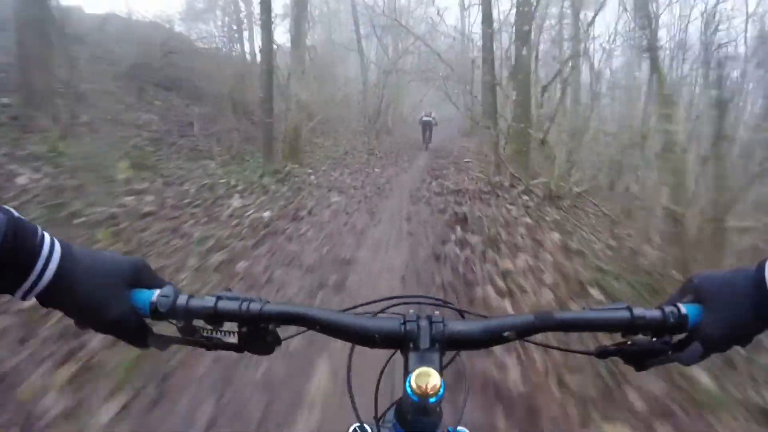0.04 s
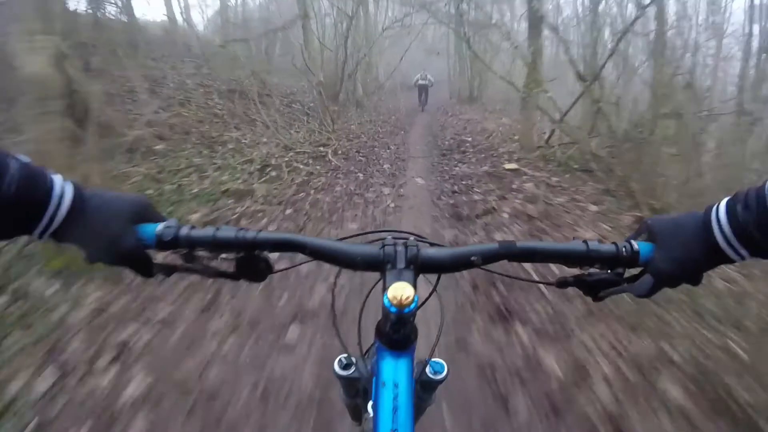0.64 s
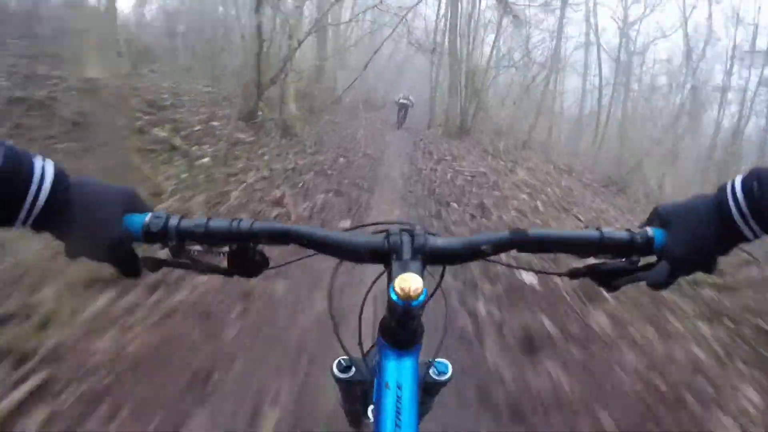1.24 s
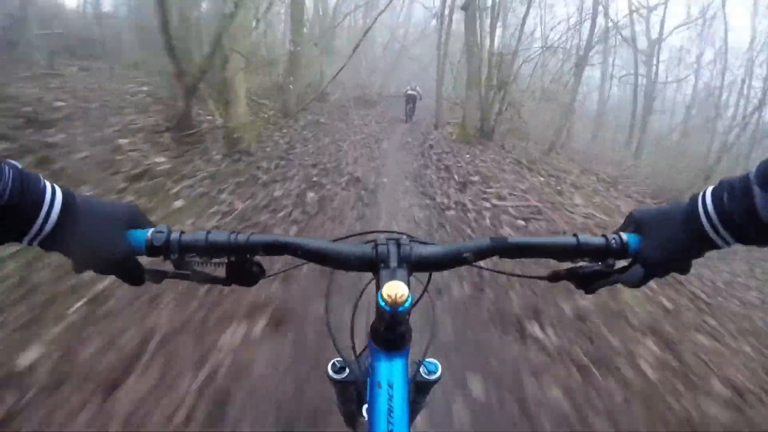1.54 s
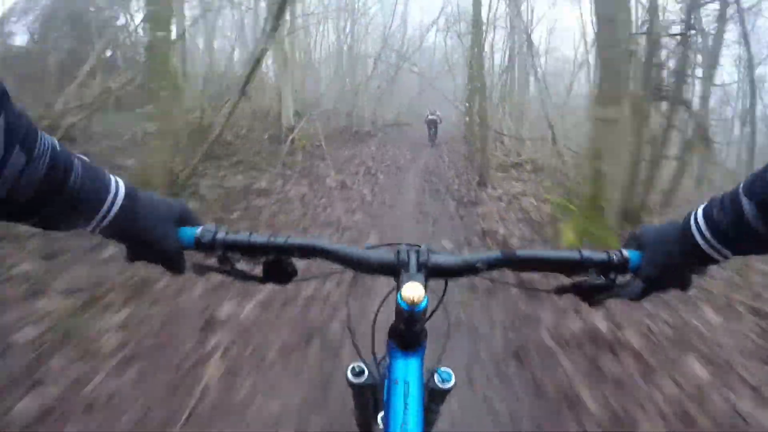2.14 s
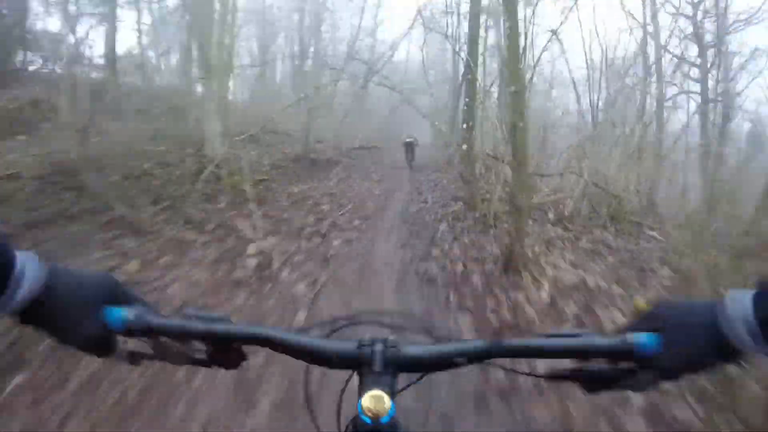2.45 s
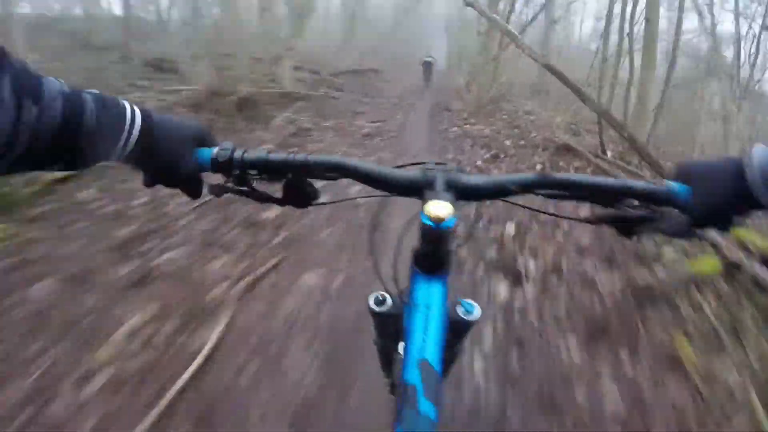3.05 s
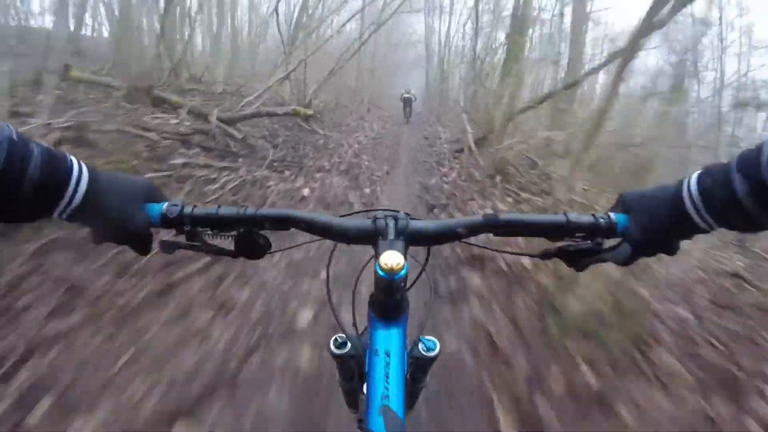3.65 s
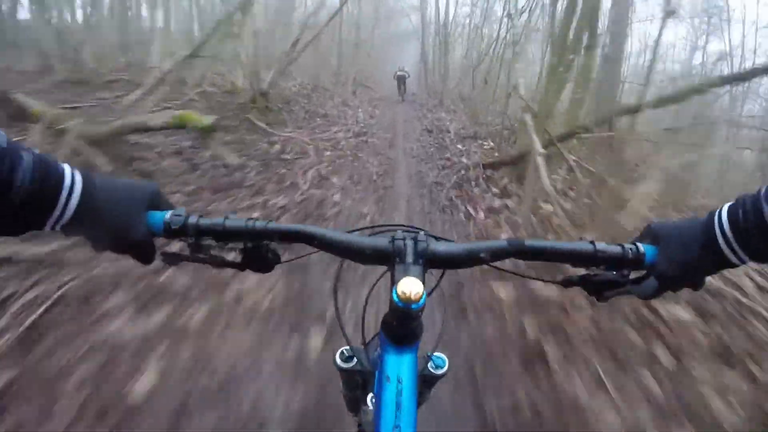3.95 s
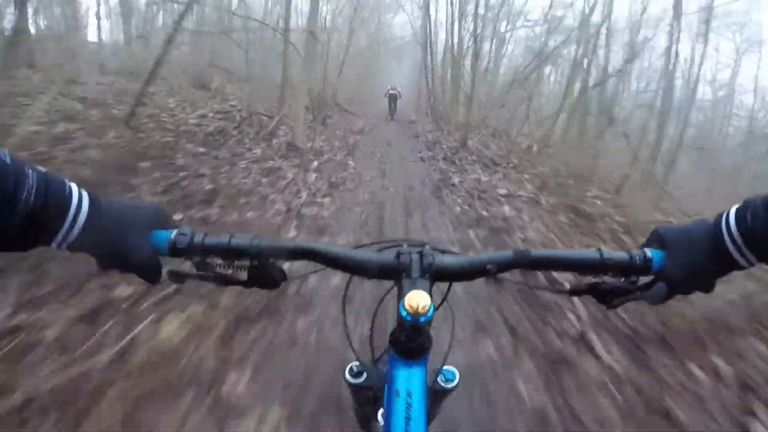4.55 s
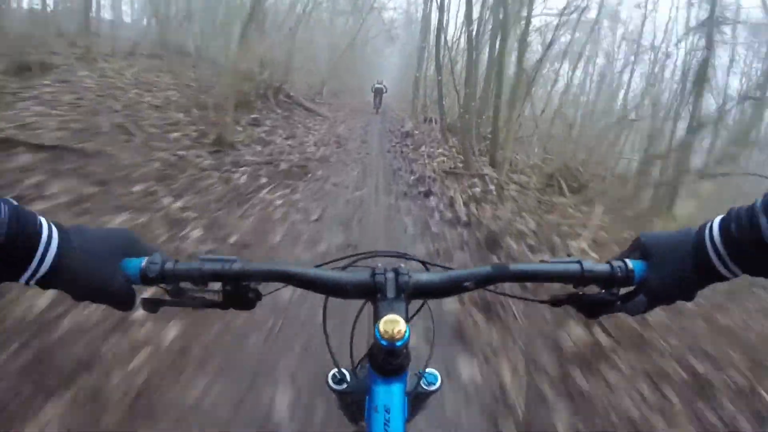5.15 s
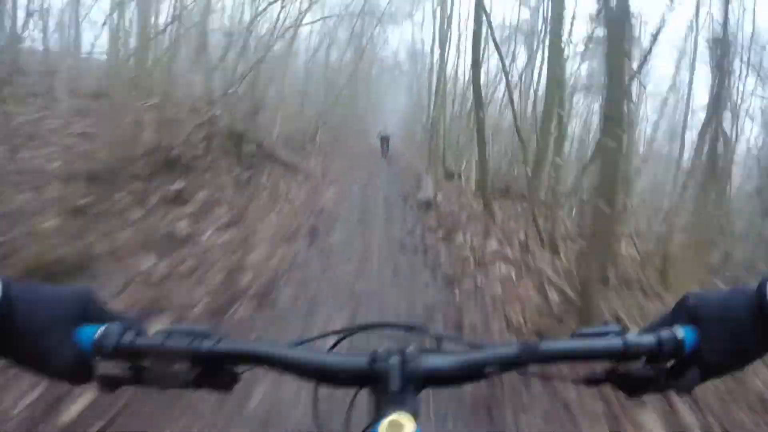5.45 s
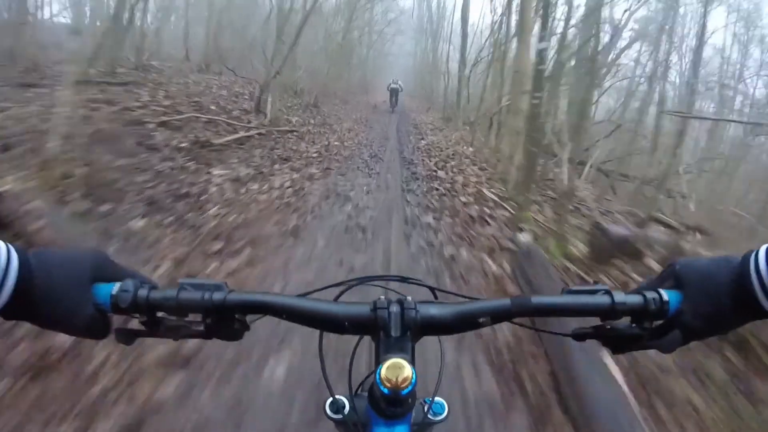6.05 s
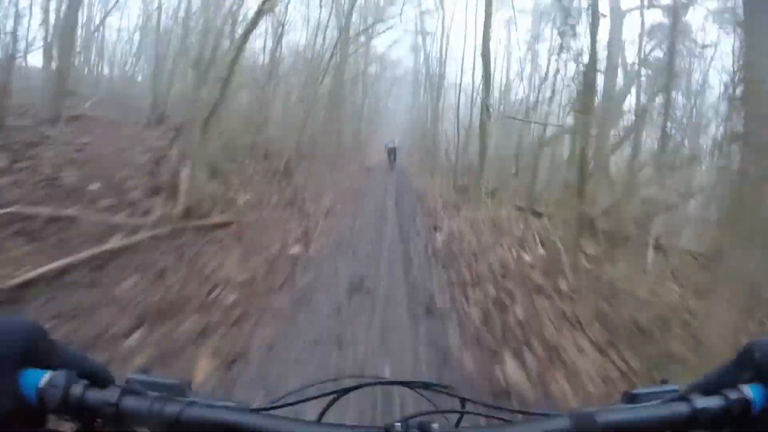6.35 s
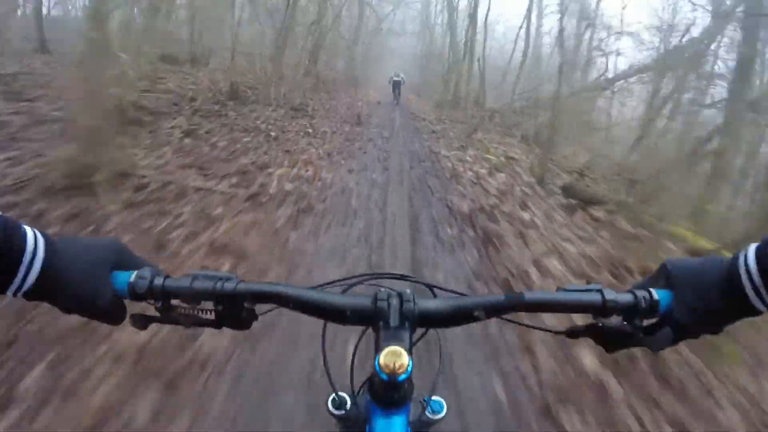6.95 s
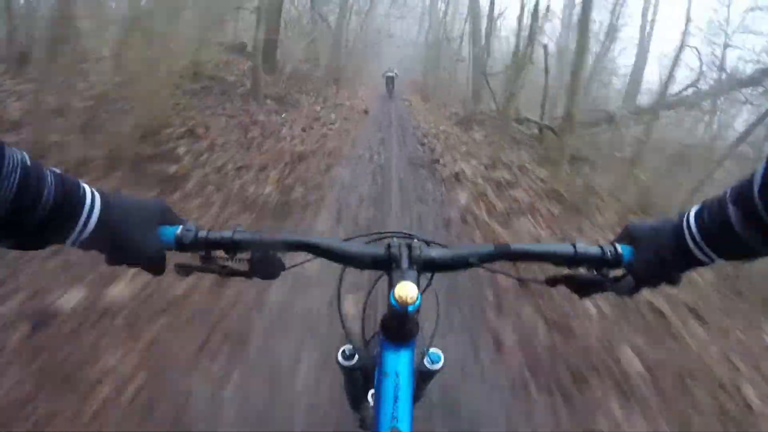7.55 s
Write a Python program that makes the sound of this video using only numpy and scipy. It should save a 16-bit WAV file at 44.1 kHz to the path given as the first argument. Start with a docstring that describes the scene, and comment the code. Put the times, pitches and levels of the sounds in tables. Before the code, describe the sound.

Low, gusting wind beats on a close, body-worn microphone while bike tyres crunch and hiss along a wet forest track, both swelling over bumps. Cables and chain rattle faintly throughout. Sharp pings of grit come first, then one deep thump from a bump, then a few chain clacks on the frame among further grit clicks and soft leaf swishes. A very faint electronic whine and hiss lie underneath.

```python
"""A mountain bike rolls fast down a muddy forest trail, heard from a cased camera on the rider's chest.
From the start, turbulent air buffets the case and the tyres churn mud and wet leaves, both swelling as
bumps load the wheels, over a faint electronic whine and hiss. Loose parts rattle and a soft jolt passes.
From two seconds on, flung grit rings the shell; near three, a hard jolt thumps the camera.
In the second half the chain knocks on the frame and leaves swish along the tread."""
import sys
import numpy as np
from scipy import signal
from scipy.fft import rfft, irfft, next_fast_len
from scipy.io import wavfile
from scipy.ndimage import map_coordinates

SR = 44100
rng = np.random.default_rng(int(sys.argv[2]) if len(sys.argv) > 2 else 0)


def store_pcm(level_fs):
    """Save levels as 16-bit WAV."""
    pcm = np.round(np.clip(level_fs, -1, 1) * 32767).astype(np.int16)
    wavfile.write(sys.argv[1], SR, np.atleast_2d(pcm).T)


N = 344421


def amp(db):
    """Amplitude ratio of a level in decibels."""
    return 10 ** (np.asarray(db) / 20)


def unit(x):
    """Normalisation to an rms of 1."""
    return x / np.sqrt(np.mean(x ** 2) + 1e-20)


def crest(x):
    """Normalisation to a peak of 1."""
    return x / (np.abs(x).max() + 1e-20)


def curve(points):
    """Linear interpolation of (time [s], value) points at every sample."""
    return np.interp(np.arange(N) / SR, *np.transpose(points))


def swells(rows):
    """Superposition of Gaussian pulses, from rows of (time [s], width [s], height)."""
    t = np.arange(N) / SR
    return sum(height * np.exp(-((t - s) / width) ** 2 / 2) for s, width, height in rows)


def wobble(rate):
    """Slow random modulation: a spline through `rate` random knots a second."""
    return map_coordinates(rng.standard_normal(int(N * rate / SR) + 4), [np.arange(N) * rate / SR])


def colour(x, spectrum):
    """Minimum-phase filtering through (frequency [Hz], gain [dB]) points on a log frequency axis."""
    size = 2 * next_fast_len(len(x) // 2 + 4096)
    hz, db = np.transpose(spectrum)
    gain_db = np.interp(np.log(np.fft.rfftfreq(size, 1 / SR) + 1), np.log(hz + 1), db)
    cepstrum = irfft(np.log(amp(gain_db)), size)
    cepstrum[1:size // 2] *= 2  # folding the cepstrum makes the filter causal
    cepstrum[size // 2 + 1:] = 0
    return irfft(rfft(x, size) * np.exp(rfft(cepstrum)), size)[:len(x)]


def noise(spectrum):
    """Spectral shaping of white noise, at an rms of 1."""
    return unit(colour(rng.standard_normal(N), spectrum))


def burst(t, t60):
    """Exponential decay of white noise, by 60 dB in t60 seconds."""
    return rng.standard_normal(len(t)) * amp(-60 * t / t60)


def ring(modes, t, polarity=-1, scatter_db=1.5):
    """Free vibration of damped modes at scattered strengths; polarity 1 leaves notches between them."""
    return sum(polarity ** k * amp(db + scatter_db * rng.standard_normal() - 60 * t / t60)
               * np.sin(2 * np.pi * hz * t) for k, (hz, db, t60) in enumerate(modes))


def add(track, s, sound):
    """Superposition of a sound on the track, starting at s seconds."""
    start = max(round(s * SR), 0)
    track[start:start + len(sound)] += sound[:N - start]


def wind(load_db):
    """Turbulent pressure: gusts heave and buffet the case, eddies rumble and the fastest air rushes."""
    # steady airflow past the camera: (time [s], level [dB])
    airflow = [(0, -3.5), (0.65, 3.5), (0.9, 0), (1.15, -2), (1.6, 1), (2.1, -2.5), (2.5, 0), (2.72, 4),
               (3.0, -3), (3.3, 0.5), (4.1, 0), (4.65, 1.5), (5.0, -1), (5.4, -1.5), (5.95, 5), (6.3, -3.5),
               (6.75, 1.5), (7.3, -6), (7.81, 1.5)]
    # gusts and lulls: (time [s], width [s], heave gain [dB], buffet gain [dB])
    gusts = [(0.03, .07, 0, 8), (.85, .05, -3, -4), (1.36, 0.085, 20, 6), (1.72, .06, -1, 6),
             (2.05, .05, -2, -3), (2.3, .06, 9, 8), (2.63, 0.075, 19, 18), (2.88, 0.09, 11, 8),
             (3.09, 0.05, 8, 11), (3.7, 0.12, 17, 5), (4.25, .08, 7, -1), (4.58, 0.15, 10, 4),
             (6.72, 0.16, 7.5, 6), (7.32, 0.05, 16, 10), (7.58, 0.04, 7, 11)]
    # bands of the turbulence, lowest first: (frequency [Hz], level [dB])
    heave_spectrum = [(2, -3.5), (7, 9), (13, 4.5), (18, -11), (26, -31.5), (50, -95.5)]
    buffet_spectrum = [(4, -20), (15, -4), (24, -1.5), (33, -7), (46, -18), (75, -37), (130, -64),
                       (400, -120)]
    rumble_spectrum = [(25, -12), (45, 6.5), (62, 2), (85, 2.5), (105, -2.5), (128, -5.5), (160, -13),
                       (220, -25.5), (400, -45.5), (1200, -120)]
    rush_spectrum = [(70, -22.5), (130, -0.5), (190, 1.5), (250, -1.5), (320, -4), (440, -7), (610, -9.5),
                     (860, -14.5), (1400, -18.5), (2000, -43), (6000, -120)]
    air_db = curve(airflow)
    eddies = wobble(45)
    heave_db = swells([(s, width, db) for s, width, db, _ in gusts])
    buffet_db = swells([(s, width, db) for s, width, _, db in gusts])
    heave = noise(heave_spectrum)
    buffet = noise(buffet_spectrum)
    rumble = unit(colour(rng.standard_normal(N) * amp(2.37 * eddies), rumble_spectrum))
    rush = unit(colour(rng.standard_normal(N) * amp(eddies + 1.26 * wobble(110)), rush_spectrum))
    return (amp(-29 + heave_db) * heave
            + amp(-36 + buffet_db + 0.25 * load_db) * buffet  # bumps stir the air too
            + amp(-38.5 + air_db + load_db) * rumble
            + amp(-48.5 + 0.087 * air_db + 0.58 * load_db) * rush)


def grains(rate, spread_db):
    """Shot noise: on average `rate` tiny impacts a second, of uneven size, at an rms of 1."""
    size = amp(spread_db * np.minimum(rng.standard_exponential(N), 3))
    return unit((rng.random(N) < rate / SR) * size * rng.choice([-1, 1], N))


def leaf_gain_db(entry_s=0.011):
    """Level envelope of the spray: an abrupt rise on entering wet leaves, then a gradual fall."""
    # stretches of wet leaves: (time [s], spray gain [dB], fade [s])
    leaf_beds = [(0.55, 2, 0.2), (1.12, 6, 0.34), (2.92, 1, .2), (3.41, 6, 0.2), (5.89, 3, 0.22),
                 (6.24, 6.5, 0.073)]
    t = np.arange(N) / SR
    return sum(db * np.clip((t - s) / entry_s, 0, 1) * np.exp(-((t - s) / fade) ** 2)
               for s, db, fade in leaf_beds)


def tyres(load_db):
    """Rolling noise: knobs crush mud and leaves and throw off spray; case resonances make both hollow."""
    # firmness of the trail, heard in the churn: (time [s], level [dB])
    firmness = [(0, -1), (0.8, -1.5), (1.5, 0.4), (2.4, 0.1), (3.4, -1.5), (4.3, -1), (5.6, 0), (6.7, 0),
                (7.81, 0.5)]
    # churn and spray as heard through the case: (frequency [Hz], level [dB])
    churn_spectrum = [(600, -30.5), (1000, -11.5), (1330, -4.5), (1560, 4), (1720, -2), (1880, 3),
                      (2170, -8), (2400, 0.5), (2600, 8), (2950, 2), (3400, -9), (4000, -12), (5500, -82),
                      (9000, -82)]
    spray_spectrum = [(1500, -33.5), (3000, 10.5), (3900, 1.5), (4650, 5.5), (5250, -3), (5850, 1),
                      (6600, -8), (7300, -10.5), (8300, -25), (10500, -23), (14000, -43)]
    ground = wobble(70)
    crunch = unit(rng.standard_normal(N) + amp(-3) * grains(rate=400, spread_db=6))
    fizz = unit(rng.standard_normal(N) + amp(-8) * grains(rate=1100, spread_db=5.5))
    churn = unit(colour(crunch, churn_spectrum))
    spray = unit(colour(fizz, spray_spectrum))
    churn_db = -50 + curve(firmness) + load_db + 1.1 * ground
    spray_db = -60 + leaf_gain_db() + 0.87 * load_db + 2 * ground
    return amp(churn_db) * churn + amp(spray_db) * spray


def whine():
    """Beating: the camera's electronics whistle faintly in two close, slightly wandering tones."""
    # electronic tones: (frequency [Hz], level [dB])
    tones = [(9650, -74.5), (9590, -81)]
    return sum(amp(db) * unit(np.sin(2 * np.pi * np.cumsum(hz + 3 * wobble(25)) / SR))
               for hz, db in tones)


def hiss():
    """Self-noise: the microphone adds a faint, steady broadband floor."""
    # microphone noise: (frequency [Hz], level [dB])
    hiss_spectrum = [(2000, -3), (4000, 1.5), (6000, 0.5), (7300, 1), (8300, -1.5), (10500, -7),
                     (12500, -7), (14000, -20), (16000, -33)]
    return amp(-66) * noise(hiss_spectrum)


def rattles(load_db, tap_count=50, tap_hz=2440, tick_t60=0.012):
    """Heavily damped impacts: cables and chain tick on the frame; faint taps crowd and harden on bumps."""
    # ticks of loose parts: (time [s], level [dB], pitch [Hz], relative edge level [dB])
    ticks = [(0.037, -30, 2700, -14), (0.050, -34, 1500, -12), (0.453, -31, 1350, -1),
             (0.497, -33, 1800, -10), (1.489, -35, 2750, -4), (1.623, -31, 2600, -12),
             (2.124, -34, 2500, -14), (2.489, -32, 2750, -8), (2.497, -31, 2850, -3),
             (2.545, -34, 2300, -8), (2.562, -31.5, 2400, -12), (2.650, -33, 2600, -8),
             (2.892, -31, 2500, -14), (2.935, -33, 2750, -10), (2.953, -32, 2600, -8),
             (4.034, -33.5, 2600, -10), (4.311, -33, 2700, -14), (5.060, -33.5, 2600, -8),
             (5.278, -32, 2100, -6), (5.478, -38, 2050, -4), (5.636, -35, 1450, 1),
             (5.740, -31.5, 2300, -10), (6.509, -35, 1650, 0), (7.72, -36, 1700, -10)]
    edge_spectrum = [(1200, -62), (2700, 7.5), (5400, -13), (8000, -15), (14000, -48)]
    out, t = np.zeros(N), np.arange(SR // 16) / SR
    shaking = np.cumsum(amp(2.8 * load_db))  # the tap rate rises with the load
    when, pitches = rng.random((tap_count, 2)).T
    starts = np.searchsorted(shaking, when * shaking[-1])
    taps = [(i / SR, -43 + load_db[i], tap_hz * 2 ** (pitch - .5), -8) for i, pitch in zip(starts, pitches)]
    for s, db, hz, edge_db in list(ticks) + taps:
        tone = np.sin(2 * np.pi * hz * t) * amp(-60 * t / tick_t60)
        chatter = crest(colour(burst(t, tick_t60), [(hz / 4, -60), (hz, 0), (hz * 4, -60)]))
        edge = crest(colour(burst(t, t60=0.0037), edge_spectrum))
        add(out, s, amp(db) * (chatter + amp(-6.5) * tone + amp(edge_db) * edge))
    return out


def jolts(sway_lead_s=0.004, sway_width_s=0.0175, shudder_hz=260):
    """Pressure pulses: a bump swings the camera through the air; its mount bottoms out and shudders."""
    # shocks to the camera: (time [s], push level [dB], push width [s], sway level [dB])
    shocks = [(0.352, -18, 0.0021, -28), (3.112, 0.5, 0.0026, -2)]
    out, t = np.zeros(N), np.arange(SR // 4) / SR
    centre = t.mean()
    t = t - centre
    u = (t + sway_lead_s) / sway_width_s  # the slow swing turns just before the push
    sway = (u ** 2 - 1) * np.exp(-u ** 2 / 2)
    shudder = np.sin(2 * np.pi * shudder_hz * t) * np.exp(-(t / 0.0015) ** 2 / 2)
    for s, push_db, width, sway_db in shocks:
        push = np.exp(-(t / width) ** 2 / 2)
        add(out, s - centre, amp(push_db) * (push + amp(-21.5) * shudder) + amp(sway_db) * sway)
    return out


def case_modes(pitch_hz, fall_db_per_octave):
    """Selective excitation: the point of impact favours the case's modes near one pitch."""
    # modes of the case: (frequency [Hz], level [dB], T60 [s])
    modes = [(1560, -1, .007), (1850, 2, .008), (2190, 0, .008), (2450, 5, .011), (3010, 3, .011),
             (3300, -1.5, .016), (3720, -4, .016), (4050, -7, .009), (4620, -6, .013), (5320, -4, .008),
             (6230, -9, .006), (6800, -4, .005), (7330, -4, .006)]
    return [(hz, db - fall_db_per_octave * abs(np.log2(hz / pitch_hz)), t60) for hz, db, t60 in modes]


def grit(ring_lag_s=0.0006):
    """Impulse response: each grain cracks and snaps on contact, then the shell's modes ring and ping."""
    # grit striking the case: (time [s], shell level [dB], shell pitch [Hz], ping level [dB],
    # ping pitch [Hz], crack level [dB], snap level [dB], snap pitch [Hz])
    strikes = [(2.1575, -21.5, 2100, -28, 5400, -31, -36, 11800),
               (2.1753, -16.5, 2700, -13, 5400, -18.5, -22, 11600),
               (2.2576, -48, 2800, -37, 6230, -47, -45, 10500),
               (2.351, -47, 3300, -35, 4600, -58, -52, 10000),
               (2.612, -35, 2800, -33, 5500, -43, -52, 12500),
               (2.617, -30, 2000, -37, 7300, -41, -52, 12500),
               (3.09, -33, 2900, -39, 5200, -37, -46, 11000),
               (3.095, -36, 2900, -44, 7300, -39, -48, 11000),
               (4.216, -26, 1900, -31, 5200, -38, -34, 10000),
               (4.9148, -12.5, 2900, -23.5, 4650, -13.5, -16, 10700),
               (5.334, -47, 2800, -42, 7000, -49, -56, 11000),
               (6.3094, -31, 3500, -36, 4400, -44, -47, 11500),
               (6.9718, -21.5, 2400, -33, 4200, -21, -20.5, 12000),
               (7.5385, -26, 3400, -23, 4950, -27.5, -23, 13400),
               (7.701, -38, 2800, -43, 6400, -47, -48, 12500)]
    # crack of the contact: (frequency [Hz], level [dB])
    crack_spectrum = [(1500, -50), (3500, -8), (4500, -1), (5500, -3), (6400, 1), (7400, 0), (8400, -9),
                      (9500, -22), (14000, -50)]
    # bright snap of the contact: (frequency [multiple of pitch], level [dB])
    snap_shape = [(.32, -61), (.64, -25), (.8, -9), (.94, 0), (1.05, 0), (1.17, -5), (1.5, -9)]
    out, t = np.zeros(N), np.arange(SR // 16) / SR
    for s, shell_db, shell_hz, ping_db, ping_hz, crack_db, snap_db, snap_hz in strikes:
        broad_ring = ring(case_modes(shell_hz, fall_db_per_octave=9), t)
        narrow_ring = ring(case_modes(ping_hz, fall_db_per_octave=60), t, polarity=1)
        shell = crest(colour(broad_ring, [(700, -20), (2000, 3)]))
        ping = crest(colour(narrow_ring, [(1500, -30), (4000, 0)]))
        contact = amp(-20) * burst(t, t60=0.005) + (t == 0)
        crack = crest(colour(contact, crack_spectrum))
        snap = crest(colour(contact, [(snap_hz * multiple, db) for multiple, db in snap_shape]))
        add(out, s, amp(crack_db) * crack + amp(snap_db) * snap)
        add(out, s + ring_lag_s, amp(shell_db) * shell + amp(ping_db) * ping)
    return out


def knocks(thud_rise_s=0.003):
    """Rebound and resonance: the chain slaps and bounces while the frame's hollow ring builds and dies."""
    # chain slaps: (time [s], clack level [dB], thud level [dB], clack pitch [Hz], bounce interval [s])
    slaps = [(4.2150, -33, -35.5, 1100, .0003), (4.4138, -16, -28.5, 2650, .0013),
             (6.6875, -33, -25, 2400, .0021)]
    # contacts within one slap: (delay [bounce intervals], level [dB])
    bounces = [(0, 6), (.9, 7), (2, 6), (3.2, 5)]
    # spectrum of the clack: (frequency [multiple of pitch], level [dB])
    clack_shape = [(.5, -27), (.68, -6), (1, 0), (1.25, -4), (1.5, -14), (1.85, -17), (2.2, -31),
                   (2.75, -33), (3.5, -48), (6, -66)]
    # modes of the frame: (frequency [Hz], level [dB], T60 [s])
    frame_modes = [(169, -4, .09), (320, -4, .06), (403, 0, .08), (479, -5, .055), (667, -5, .035),
                   (766, -9, .03), (843, -4, .035), (1070, -13, .025), (1540, -3, .025), (1700, 2, .028)]
    out, t = np.zeros(N), np.arange(SR // 8) / SR
    for s, clack_db, thud_db, hz, bounce_s in slaps:
        contact = amp(-12.5) * burst(t, t60=0.04)
        for delay, bounce_db in bounces:
            contact[round(delay * bounce_s * SR)] += amp(bounce_db)
        clack = colour(contact, [(hz * multiple, db) for multiple, db in clack_shape])
        thud = ring(frame_modes, t) * (1 - np.exp(-t / thud_rise_s))
        add(out, s, amp(clack_db) * crest(clack) + amp(thud_db) * crest(thud))
    return out


def swishes():
    """Friction noise: wet leaves brush along the tread in soft, narrow hisses that swell and fade."""
    # leaves sweeping past the tyre: (time [s], level [dB], width [s])
    sweeps = [(4.255, -55, 0.011), (4.615, -52.5, 0.044), (4.812, -57, 0.0082), (6.873, -56, 0.023)]
    envelope = swells([(s, width, amp(db)) for s, db, width in sweeps])
    return envelope * noise([(2500, -23), (4000, -2), (4700, 2), (5700, -3), (6800, -13), (12000, -54)])


def scene():
    """Superposition at one close microphone; the tyre load modulates wind, rolling noise and taps."""
    # the ground presses the tyres (+) or drops away (-): (time [s], width [s], load [dB])
    bumps = [(0.24, 0.019, -5), (0.37, 0.024, 1), (0.98, 0.077, -1.5), (1.17, 0.043, 2.5),
             (1.30, 0.042, 3.5), (1.55, 0.053, 1), (2.03, 0.057, -1.5), (2.585, 0.042, 6),
             (2.79, 0.075, -4), (2.96, 0.022, 5), (3.075, 0.031, 4.5), (3.18, .035, -1), (3.37, 0.02, -1),
             (3.62, 0.038, 4), (3.84, 0.024, -1.5), (4.61, 0.03, 2.5), (5.12, .03, 2.5), (5.82, 0.037, -3),
             (6.12, 0.024, 4), (6.35, 0.024, -3.5), (6.88, 0.018, 3.5), (7.16, 0.059, -1.5),
             (7.39, 0.064, 2), (7.57, 0.025, 2), (7.69, 0.047, -3.5)]
    load_db = swells(bumps)
    riding = wind(load_db) + tyres(load_db) + swishes()
    impacts = grit() + rattles(load_db) + knocks() + jolts()
    return (riding + impacts + whine() + hiss())[None]


def record(dry):
    """Band limiting: the camera's steep low-pass filter removes the highest treble."""
    return signal.sosfilt(signal.butter(16, 15750, fs=SR, output="sos"), dry)


dry = scene()
out = record(dry)
store_pcm(out)
```